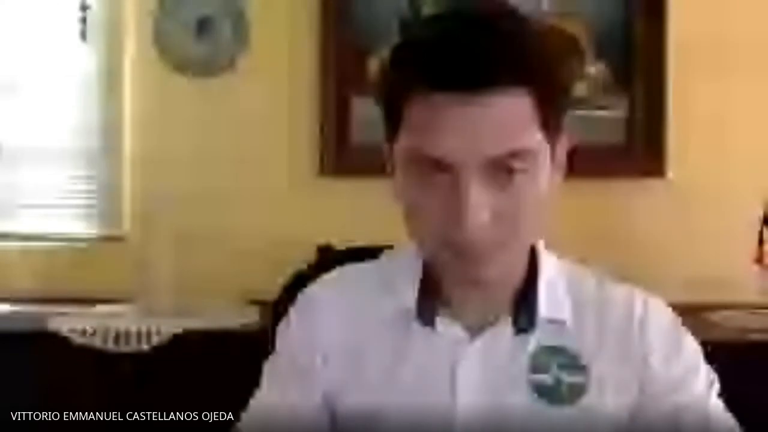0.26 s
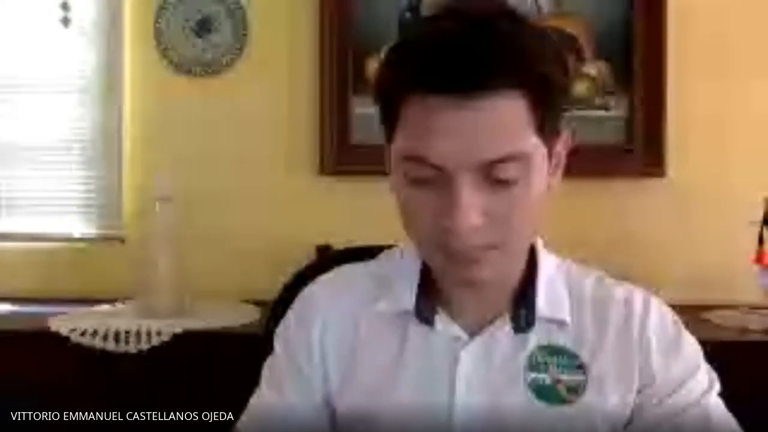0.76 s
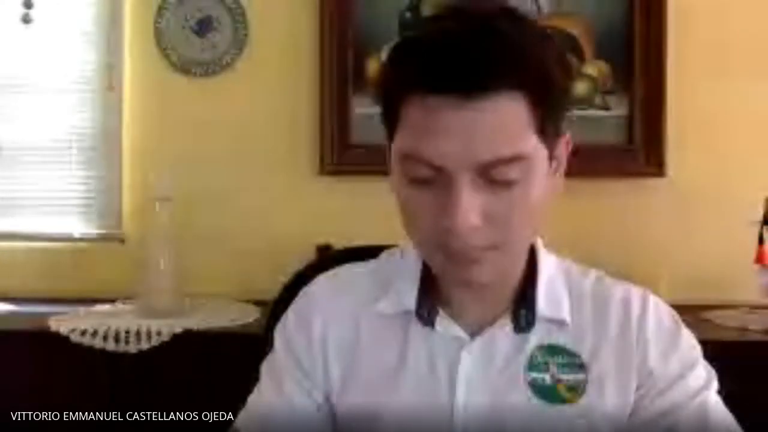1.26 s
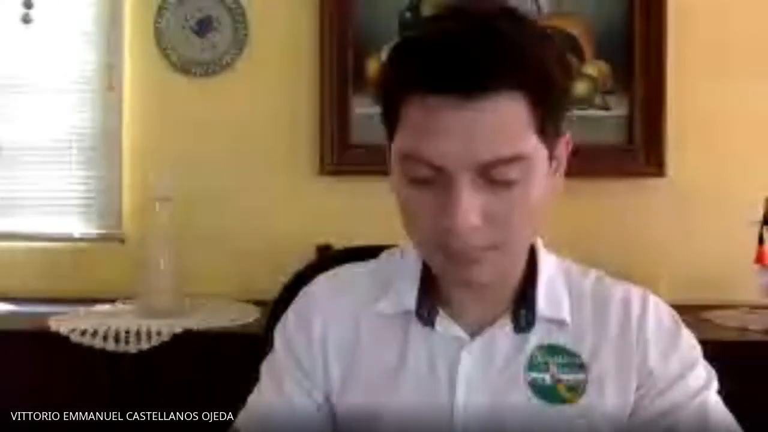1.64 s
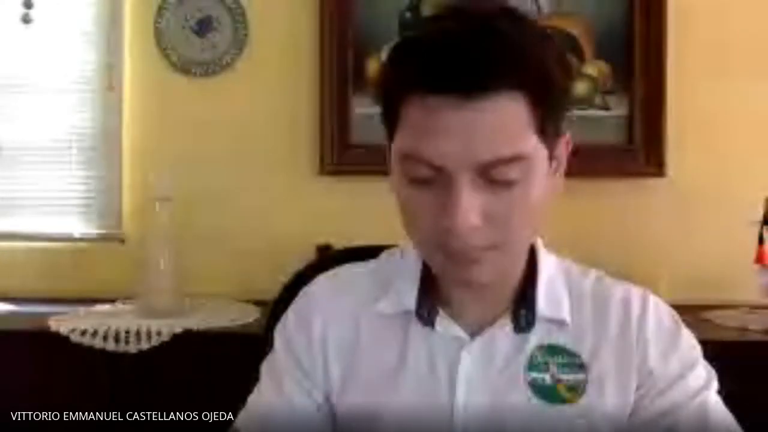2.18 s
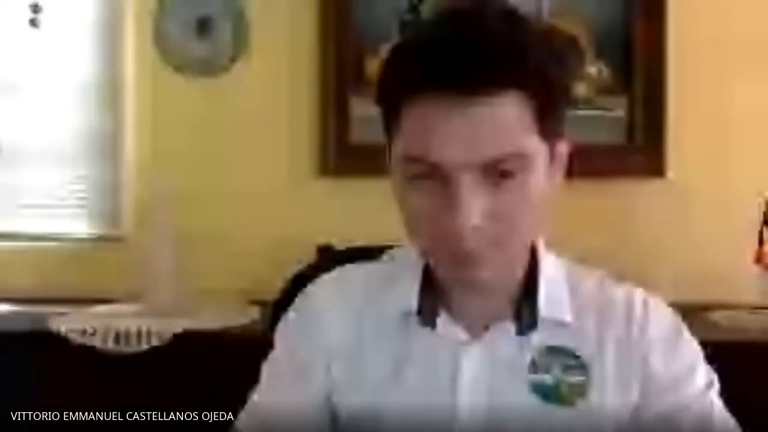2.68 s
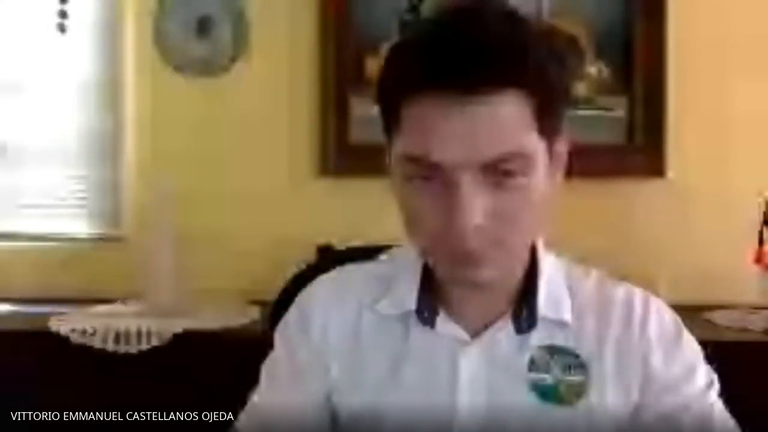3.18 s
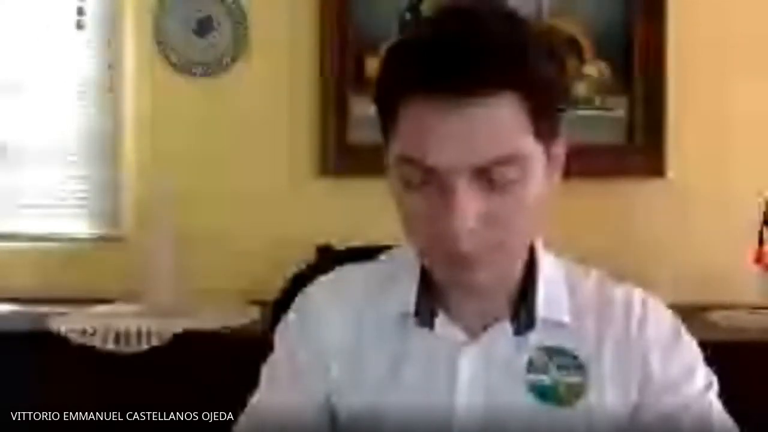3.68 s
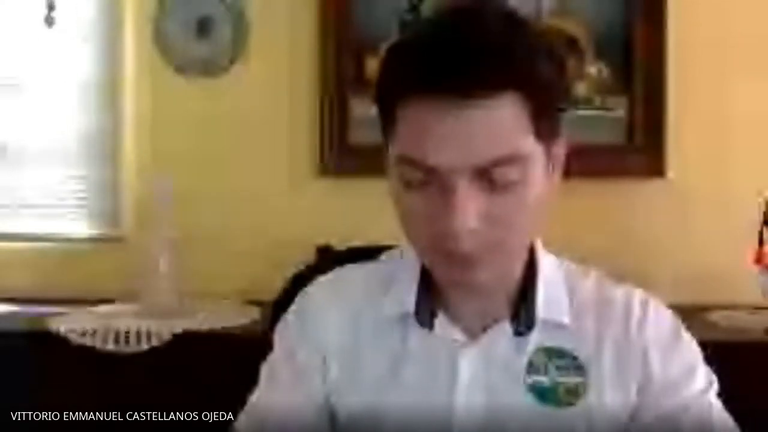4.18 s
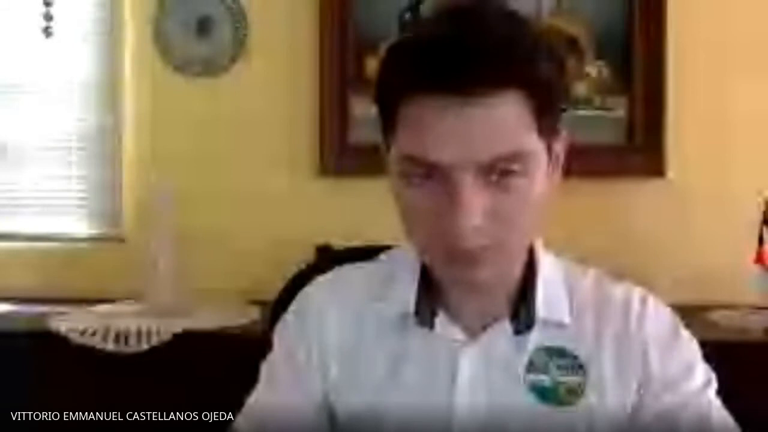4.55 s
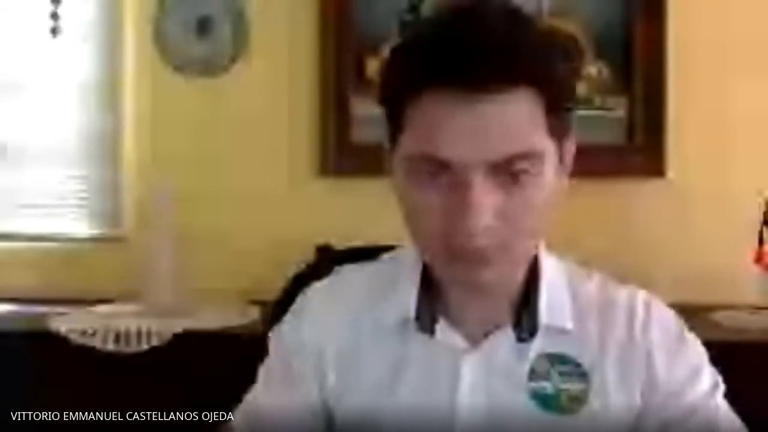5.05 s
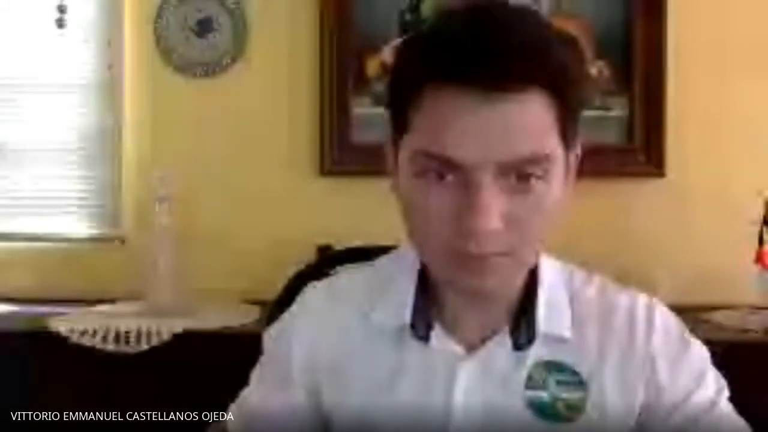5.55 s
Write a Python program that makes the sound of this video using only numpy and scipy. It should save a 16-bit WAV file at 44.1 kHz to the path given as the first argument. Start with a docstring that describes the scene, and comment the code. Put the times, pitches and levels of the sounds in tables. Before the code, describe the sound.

Close mono pickup of laptop typing: bright plasticky clicks, each with a tiny landing, bottoming and rebound, plus low booms through the chassis. A first burst of separate presses, a pause, a few light taps, a short firm cluster, another pause with a dull thump, then a dense rapid flurry. It ends in steady soft hiss with short room reflections still audible around the keys.

```python
"""Faint hiss and rumble of a quiet room, a low thud, then bursts of typing on a laptop keyboard.
Each press is a brush, a landing, a bottoming and a rebound: noise chatters filtered by case, keycap and ping modes.
Pitch-sagging sine pulses make the thuds of palms and the boom of the deck under each key.
Filtered noise tails throw the keys back from the room; drifting coloured noises make the background."""
import sys
import numpy as np
from scipy import signal
from scipy.fft import rfft, irfft
from scipy.io import wavfile
from scipy.ndimage import uniform_filter1d

SR = 44100
rng = np.random.default_rng(int(sys.argv[2]) if len(sys.argv) > 2 else 0)


def store_pcm(level_fs):
    """Save levels as 16-bit WAV."""
    pcm = np.round(np.clip(level_fs, -1, 1) * 32767).astype(np.int16)
    wavfile.write(sys.argv[1], SR, np.atleast_2d(pcm).T)


N = 256662

# Background colours: (frequency [Hz], relative density [dB])
ROOM_TONE_COLOUR = [(60, -2.5), (140, -5), (230, 3), (310, -2.5), (450, -6.5), (700, -15), (1000, -16.5),
                    (1700, -22), (3700, -21.5), (7600, -25), (8200, -20.5), (9400, -20.5), (9800, -33.5),
                    (12000, -35)]
RUMBLE_COLOUR = [(30, -24), (55, 4), (90, -5), (135, 5), (200, -5), (310, -7.5), (450, -27), (900, -45.5)]
BASS_COLOUR = [(10, -29), (22, -30), (32, -16), (45, -35), (65, -4), (110, 2), (300, -40)]
# Room tone with hiss: (time [s], level [dB])
ROOM_TONE_LEVEL = [(0, -60), (.35, -60), (1.3, -55.5), (2.3, -56.5), (5.35, -55), (5.46, -53.5),
                   (5.82, -54.5)]
# Rumble of the hands: (time [s], level before RUMBLE_GAIN_DB [dB])
RUMBLE_LEVEL = [(0.0, -64), (0.18, -59), (0.53, -54.5), (1.12, -53), (1.46, -59.5), (1.7, -55.5),
                (1.88, -51), (2.25, -52.5), (2.61, -50), (2.71, -46.5), (3.11, -59.5), (4.18, -48.5),
                (4.47, -45.5), (4.65, -48), (4.81, -49), (5.04, -54), (5.54, -59.5), (5.82, -62)]
# Hum-like bass noise: (time [s], level before BASS_GAIN_DB [dB])
BASS_LEVEL = [(0.0, -72), (0.13, -71), (0.24, -78), (0.95, -90), (1.96, -57), (3.6, -54), (4.0, -77),
              (4.59, -52), (4.81, -80), (5.82, -61)]
RUMBLE_GAIN_DB, BASS_GAIN_DB = -0.5, 0.5

# Palm pushes on the chassis: (time [s], level [dB], pitch at the peak [Hz], rise [s])
THUDS = [(0.278, -36, 100, 0.01), (.574, -36.6, 77, 0.011), (0.606, -36, 90.5, 0.013),
         (1.706, -38, 89, 0.0088), (1.819, -31, 91.5, 0.0093), (1.994, -36, 111, 0.016),
         (2.043, -37.5, 171, 0.0048), (2.422, -26.5, 92, 0.012), (2.451, -24, 83, 0.018),
         (2.482, -23.5, 95, .012), (2.725, -27.5, 84, 0.02), (3.059, -42.5, 94, .0078),
         (3.365, -19.5, 95.3, 0.0096), (3.874, -38, 110, 0.0054), (4.372, -38, 84, 0.016),
         (4.418, -31.5, 94.5, 0.0076), (4.5, -36, 75, 0.014), (4.525, -32.5, 119, 0.025),
         (4.584, -26.5, 107, 0.0073), (4.599, -27.5, 124, 0.0068)]
PITCH_SAG = 0.1  # share by which the pitch sinks after the peak of a push

# Key presses: (landing time [s], landing energy [dB], travel to the bottom [s], bottoming energy [dB],
# landing spread [s], bottoming spread [s], case knock before blow offset [dB], case pitch [Hz],
# keycap pitch before blow ratio [Hz], ping [dB], deck boom relative to the blow [dB], deck pitch [Hz])
PRESSES = [(0.4338, -15, .0047, -12.5, .0014, 0.0071, 2, 715, 5900, -9.5, -10, 200),
           (.527, -16, .007, -17, 0.0035, 0.0065, 1, 1240, 4570, -7, -4, 197),
           (.549, -9.5, 0.0061, -6.5, 0.0033, 0.0024, 8.5, 2450, 5430, 4, -11, 255),
           (.657, -13.5, 0.0094, -21, 0.0087, 0.0018, -3.5, 1480, 5100, 3.5, 5.5, 129),
           (0.8111, -8.5, 0.0075, -10, 0.0028, 0.0026, 11, 910, 5030, -0.5, 0, 298),
           (.9246, -15, 0.013, -.5, 0.015, 0.0041, 1.5, 2710, 4940, 5, -3.5, 247),
           (1.073, -8, 0.0058, 0, 0.0053, 0.0035, 3.5, 1390, 4840, 3, 1, 205),
           (1.1522, -4, 0.0082, -10.5, 0.0015, 0.0017, 1.5, 1730, 4940, 8, -15, 199),
           (1.6516, -12, 0.0056, -17, 0.0012, 0.0015, 5.5, 900, 4500, 0.5, -3, 202),
           (1.746, -19.5, 0.0031, -14, 0.0017, 0.0016, 2.5, 1170, 5600, 12.5, -11, 198),
           (1.8655, -16.5, 0.015, -20, 0.0052, .001, -9, 1000, 6800, 0.5, -5, 267),
           (2.464, -6.5, .005, -4.5, 0.0037, .0025, 4, 1200, 5900, 5, -6, 449),
           (2.5563, -5.5, .011, -5, 0.00084, 0.0015, -9.5, 4270, 4400, -8, -8, 194),
           (2.6681, -14, 0.012, -5, .0009, 0.0027, -6, 3260, 4750, 2, -0.5, 306),
           (2.8968, -10.5, 0.0056, -10.5, 0.0018, 0.002, -4, 2730, 5900, 9.5, 3, 227),
           (3.7, -8, 0.0054, -4, 0.0019, 0.0021, 3, 896, 5100, 1, -22, 300),
           (3.796, -6.5, 0.012, 2, .005, 0.0024, 1.5, 2350, 4700, -3, -18, 316),
           (3.933, -3.5, 0.0074, -2, .0036, 0.003, 3.5, 1170, 5230, 4.5, -25, 300),
           (4.014, -10, .01, -1.5, 0.0011, 0.0041, 0, 1840, 5000, -1, -20, 251),
           (4.1832, -4.5, 0.0061, 1, 0.0019, 0.00099, 2.5, 2530, 6050, 5, -17, 204),
           (4.203, -10, 0.0043, 3.5, .002, 0.00067, -1, 1420, 5900, 4, -8.5, 351),
           (4.2812, -5, 0.013, 2.5, .0038, 0.003, 7.5, 710, 5100, 3, -3, 277),
           (4.3873, -5.5, 0.01, 2, 0.005, 0.0024, 11, 950, 5100, 5.5, -5.5, 203),
           (4.4753, -9.5, 0.0039, -14, 0.0015, 0.0022, 4.5, 1360, 4240, -1, -8, 202),
           (4.5193, 4.5, 0.0053, 2, 0.0011, 0.0007, -1.5, 2600, 5670, -5, -7, 430),
           (4.5902, -3.5, .005, -5.5, 0.0026, 0.0016, -2.5, 720, 4350, 1, 1.5, 327),
           (4.796, -20, 0.0081, -6.5, 0.0028, 0.0019, -7.5, 1560, 5460, 18.5, -9, 285)]
# Short clicks between and just after the presses, some of them bright treble reflections off the room:
# (time [s], energy [dB], chatter spread [s], case knock [dB], keycap pitch [Hz], ping [dB])
SHORT_CLICKS = [(.569, -12, 0.018, -11, 4530, -1), (.645, -23, 0.0084, -3, 5490, 8),
                (0.6818, -18.5, .004, -22, 5790, 3), (.9061, -21, 0.0011, -18, 5170, -12),
                (.9141, -10, 0.0013, -24, 5170, -16), (1.021, -21, 0.0036, 0, 5000, 4),
                (1.042, -14, 0.0092, -4, 4800, 1), (1.101, -12, 0.0034, -10, 4530, 20),
                (1.1068, -12, 0.0011, 4, 4370, 11), (1.67, -24.5, 0.0017, 17, 5120, -11),
                (1.6953, -19.5, 0.00047, -10, 4130, -26), (1.9102, -25, 0.00026, -18, 4330, -11),
                (2.576, -9.5, 0.0018, -9, 2860, 3), (2.6101, -13.5, 0.00098, -8, 4030, 4),
                (2.624, -15.5, 0.00076, 2, 4420, 7), (2.657, -18, 0.00064, 0, 5730, 6),
                (3.024, -26.5, 0.0012, 10, 5810, 17.5), (3.732, -14.5, .0005, -1, 6330, -7),
                (3.786, -14, .003, 10, 5120, -4), (3.878, -11, 0.014, 2.5, 4800, -2),
                (4.041, -9, .003, 5, 5300, 9), (4.1018, -8, 0.0014, -5.5, 5930, -5),
                (4.222, -20, 0.0015, -4, 5000, 23), (4.259, -10, 0.00093, -8, 5710, 13),
                (4.3173, -6.5, 0.0018, -2, 6150, 8), (4.466, -15, 0.0033, -9, 4950, -9),
                (4.5415, -7.5, 0.0016, 5, 5900, 28), (4.562, -9.5, .007, 4, 3290, 31),
                (4.635, -19.5, 0.0097, -1, 5200, 0), (4.676, -21, 0.011, -18, 5430, -3),
                (4.776, -21.5, 0.014, -10, 5400, -12), (4.856, -28, 0.0055, 11, 4470, -5),
                (4.923, -33, 0.0065, 10, 4360, -3)]
# Colour shared by all keys: (frequency [Hz], relative gain [dB])
CASE_COLOUR = [(80, -25), (300, -11), (520, -15), (700, -10.5), (1000, -6.5), (1350, -7.5), (1900, -8.5),
               (2700, -6.5), (3800, -4.5), (5200, -2), (6500, -1), (7400, -5.5), (8400, 0.5), (9400, -7.5),
               (11500, -25)]
TOUCH_LEAD_S = 0.0082  # fingertip meets the cap; the press is silent before
BRUSH_LEAD_S, BRUSH_DB, BRUSH_SPREAD_S = 0.0057, -14, 0.0019
REBOUND_DELAY_S, REBOUND_SCATTER_S, REBOUND_SPREAD_S = 0.015, 0.0034, 0.002
REBOUND_DB, REBOUND_KNOCK_DB = -17, -5
CLICK_CASE_HZ = 2750
CLICK_ONSET_SPREADS = 3.5  # lead of the onset, in chatter spreads
TICK_SPREAD_S = 0.003

DECK_LEAD_S, DECK_RISE_S = 0.00649, 0.012  # the deck gives before the key hits the bottom
DECK_DB = -36  # offset from the blow
DECK_OVERTONE_RATIO, DECK_OVERTONE_DB = 1.5, -10

# Reflections: (frequency [Hz], relative level [dB])
ROOM_COLOUR = [(200, 4.5), (1200, -13.5), (3000, -5), (5500, -11), (7400, -7.5), (8500, -4.5), (9400, -0.5),
               (11500, 9)]
# Decay by 60 dB: (frequency [Hz], time [s])
ROOM_T60 = [(200, 0.34), (1200, 0.33), (3000, 0.22), (5000, 0.38), (7300, 0.25), (8600, 0.27),
            (11000, 0.37)]
WALLS_HZ = 8550  # early boost from the nearest walls is full from here up
BAND_EDGE_HZ = 12050


def amp(db):
    """Decibels to amplitude."""
    return 10 ** (np.asarray(db) / 20)


def read(points, hz):
    """Interpolates a spectrum linearly over log frequency."""
    point_hz, value = np.transpose(points)
    return np.interp(np.log(hz + 1), np.log(point_hz), value)


def level_over_time(points):
    """Interpolates a level curve at every sample."""
    return np.interp(np.arange(N) / SR, *np.transpose(points))


def bump(hz, centre_hz, octaves):
    """Bell of height 1 over log frequency."""
    return np.exp(-0.5 * (np.log2((hz + 1) / centre_hz) / octaves) ** 2)


def add(mix, start_s, sound):
    """Mixes a sound in at start_s."""
    part = mix[max(round(start_s * SR), 0):][:len(sound)]
    part += sound[:len(part)]


def background(colour, level_db, patchy_db, patch_s, patch_hz, size=1024):
    """Coloured noise that wavers in time-frequency patches under a drifting level."""
    hz, t, z = signal.stft(rng.standard_normal(N), SR, nperseg=size)
    patch_bins = max(round(patch_hz / hz[1]), 1)
    patch_frames = max(round(patch_s / t[1]), 1)
    patches = uniform_filter1d(rng.standard_normal(z.shape), patch_bins, axis=0)
    patches = uniform_filter1d(patches, patch_frames, axis=1)
    z = z * amp(read(colour, hz)[:, None] + patchy_db * patches / patches.std())
    noise = signal.istft(z, SR, nperseg=size)[1][:N]
    return noise / noise.std() * amp(level_db)


def room_tone():
    """Room tone with hiss: broadband noise, strongest in the lows."""
    return background(ROOM_TONE_COLOUR, level_over_time(ROOM_TONE_LEVEL),
                      patchy_db=2.0, patch_s=0.12, patch_hz=400)


def hand_rumble():
    """Palms shifting on the chassis: low noise."""
    return background(RUMBLE_COLOUR, level_over_time(RUMBLE_LEVEL) + RUMBLE_GAIN_DB,
                      patchy_db=4.0, patch_s=0.09, patch_hz=60, size=2048)


def bass_noise():
    """Hum-like bass noise around 65-150 Hz that comes and goes."""
    return background(BASS_COLOUR, level_over_time(BASS_LEVEL) + BASS_GAIN_DB,
                      patchy_db=3.0, patch_s=0.15, patch_hz=30, size=4096)


def rock(db, hz, rise_s, softness=2.82, shudder=0.29, shudder_s=0.032):
    """A soft push rocks the chassis for a few cycles and leaves a faint shudder."""
    t = np.arange(SR // 4) / SR
    u = t / rise_s
    swell = (u * np.exp(1 - u)) ** softness
    swell += shudder * np.tanh(u / 2) ** 4 * np.exp(-t / shudder_s)
    pitch_hz = hz * (1 + PITCH_SAG * (np.exp(1 - u) - 1))
    cycles = np.cumsum(pitch_hz) / SR + rng.random()
    return amp(db) * swell * np.sin(2 * np.pi * cycles)


def thuds():
    """Palms push on the chassis, each push one rocking pulse."""
    out = np.zeros(N)
    for start_s, db, hz, rise_s in THUDS:
        add(out, start_s, rock(db, hz, rise_s))
    return out


def blows(landing_knock_db=-3, bottom_knock_db=2, landing_pitch=1.04, bottom_pitch=0.92):
    """Yields four blows a press and one a short click: (onset [s], time [s], contact settings)."""
    for row, luck in zip(PRESSES, 2 * rng.random(len(PRESSES)) - 1):
        land_s, land_db, travel_s, bottom_db, land_spread_s, bottom_spread_s, *tone, _, _ = row
        knock_db, case_hz, key_hz, ping_db = tone
        touch_s, bottom_s = land_s - TOUCH_LEAD_S, land_s + travel_s
        rebound_s = bottom_s + REBOUND_DELAY_S + REBOUND_SCATTER_S * luck
        rebound_db = max(land_db, bottom_db) + REBOUND_DB
        yield touch_s, land_s - BRUSH_LEAD_S, land_db + BRUSH_DB, BRUSH_SPREAD_S, *tone
        yield (touch_s, land_s, land_db, land_spread_s,
               knock_db + landing_knock_db, case_hz, key_hz * landing_pitch, ping_db)
        yield (touch_s, bottom_s, bottom_db, bottom_spread_s,
               knock_db + bottom_knock_db, case_hz, key_hz * bottom_pitch, ping_db)
        yield (touch_s, rebound_s, rebound_db, REBOUND_SPREAD_S,
               knock_db + REBOUND_KNOCK_DB, case_hz, key_hz, ping_db)
    for click_s, db, spread_s, knock_db, key_hz, ping_db in SHORT_CLICKS:
        onset_s = click_s - CLICK_ONSET_SPREADS * spread_s
        yield onset_s, click_s, db, spread_s, knock_db, CLICK_CASE_HZ, key_hz, ping_db


def rattle(t, rattle_db=-12, ticks_per_s=260, fade_s=0.018):
    """The loose keycap ticks on against its hinge: sparse, fading impulses."""
    hits = (rng.random(len(t)) < ticks_per_s / SR) * rng.standard_normal(len(t))
    fade = (t > 0) * np.exp(-abs(t) / fade_s)
    return amp(rattle_db) * hits * fade / np.sqrt(ticks_per_s * fade_s / 2)


def ring(x, gain_db):
    """Filters x through a minimum-phase (causal) body with the given gain per bin."""
    log_gain = np.log(amp(np.r_[gain_db, gain_db[-2:0:-1]]))
    response = np.exp(np.conj(signal.hilbert(log_gain)))[:len(gain_db)]
    return irfft(rfft(x) * response)


def contact(draws, onset_lead_s, db, spread_s, knock_db, case_hz, key_hz, ping_db,
            cap_db=4.0, tick_db=5, cap_octaves=0.22, knock_hz=850, knock_octaves=1.5,
            mode_db=7.0, mode_octaves=0.088, ping_hz=8700, ping_octaves=0.13,
            snap_hz=11500, snap_octaves=0.36, snap_per_db=0.37,
            grain=0.64, roundness=0.57, build_roundness=0.79):
    """Tiny contacts crowd around one blow and ring case, keycap and ping: (lead [s], sound)."""
    push, weight = draws
    size = len(push)
    hz = np.fft.rfftfreq(size, 1 / SR)
    t = (np.arange(size) - size // 4) / SR
    shape = np.where(t < 0, build_roundness, roundness)  # sets in more abruptly than it dies
    crowd = np.exp(-abs(t / spread_s) ** shape) * (t > -onset_lead_s)
    chatter = push * np.exp(grain * weight) * crowd
    chatter = chatter / np.linalg.norm(chatter) + rattle(t)
    keycap_db = cap_db + tick_db * np.exp(-abs(spread_s) / TICK_SPREAD_S)  # short ticks ring the cap more
    colour_db = read(CASE_COLOUR, hz)
    colour_db += knock_db * bump(hz, knock_hz, knock_octaves)
    colour_db += mode_db * bump(hz, case_hz, mode_octaves)
    colour_db += keycap_db * bump(hz, key_hz, cap_octaves)
    colour_db += ping_db * bump(hz, ping_hz, ping_octaves)
    colour_db += snap_per_db * db * bump(hz, snap_hz, snap_octaves)  # harder blows are brighter
    click = ring(chatter, colour_db)
    return t[0], amp(db) * click / np.linalg.norm(click)


def keys(count=6, size=4096):
    """All presses and short clicks, dealt blow by blow to a few tracks."""
    tracks = np.zeros((count, N))
    for k, (onset_s, blow_s, *blow) in enumerate(blows()):
        lead_s, click = contact(rng.standard_normal((2, size)), blow_s - onset_s, *blow)
        add(tracks[k % count], blow_s + lead_s, click)
    return tracks


def deck():
    """Each bottoming key booms in the deck: a rocking pulse and its second mode."""
    out = np.zeros(N)
    for land_s, land_db, travel_s, bottom_db, *_, boom_db, hz in PRESSES:
        db = DECK_DB + max(land_db, bottom_db) + boom_db
        boom = rock(db, hz, DECK_RISE_S)
        boom += rock(db + DECK_OVERTONE_DB, hz * DECK_OVERTONE_RATIO, DECK_RISE_S)
        add(out, land_s + travel_s - DECK_LEAD_S, boom)
    return out


def room(x, wet_db=-2.0, delay_s=0.0054, build_s=0.00023, clump_db=3, clump_samples=90,
         early_db=5, early_s=0.015, early_width_s=0.0051):
    """Clumped reflections, early treble strongest off the nearest walls; each band has its own decay."""
    taps, clumps = rng.standard_normal((2, SR // 2))
    clumps = uniform_filter1d(clumps, clump_samples) * np.sqrt(clump_samples)
    taps = taps * amp(clump_db * clumps)
    hz, t, z = signal.stft(taps / taps.std(), SR, nperseg=256)
    t60_s = read(ROOM_T60, hz)[:, None]
    early = np.exp(-0.5 * ((t + delay_s - early_s) / early_width_s) ** 2)
    walls_db = early_db * early * np.minimum(hz / WALLS_HZ, 1)[:, None]
    level_db = read(ROOM_COLOUR, hz)[:, None] + walls_db - 60 * t / t60_s
    z = z * amp(level_db) * np.sqrt(2 * np.log(1000) / (t60_s * SR))  # equal energy for any decay
    tail = signal.istft(z, SR, nperseg=256)[1]
    tail *= 1 - np.exp(-np.arange(len(tail)) / (build_s * SR))
    out = np.zeros(N)
    add(out, delay_s, signal.oaconvolve(x, tail))
    return amp(wet_db) * out


def scene():
    """One microphone in both channels; successive blows get different reflections."""
    typing = sum(track + room(track) for track in keys())
    mono = room_tone() + hand_rumble() + bass_noise() + thuds() + typing + deck()
    return np.array([mono, mono])


def record(dry):
    """Linear-phase low-pass at BAND_EDGE_HZ."""
    lowpass = signal.firwin(255, BAND_EDGE_HZ, window=("kaiser", 8), fs=SR)
    return signal.oaconvolve(dry, lowpass[None], "same")


dry = scene()
out = record(dry)
store_pcm(out)
```